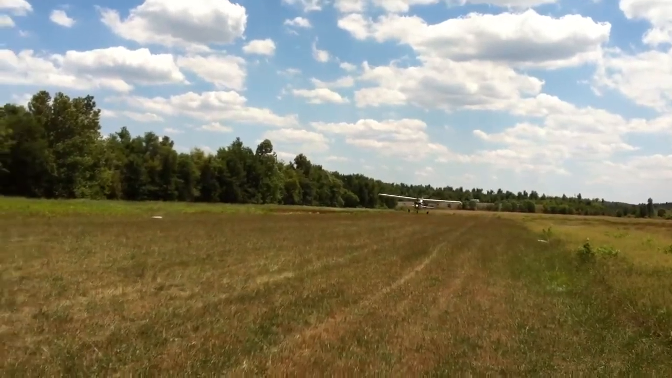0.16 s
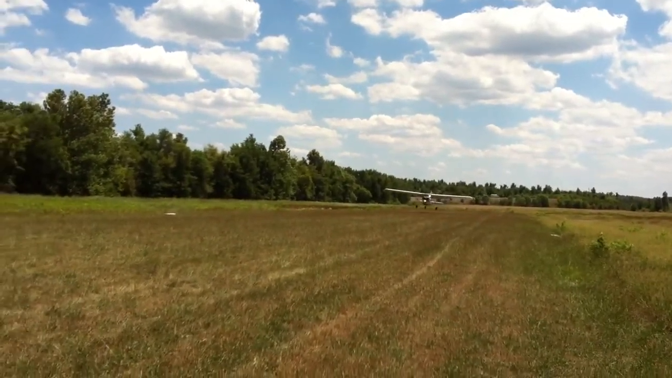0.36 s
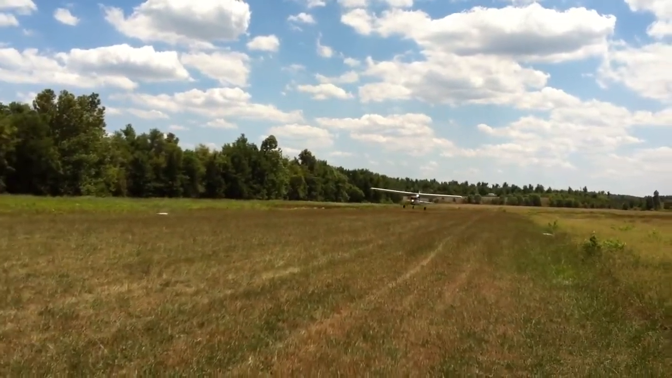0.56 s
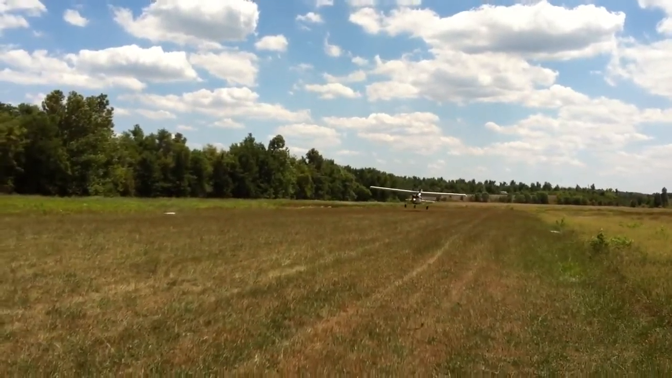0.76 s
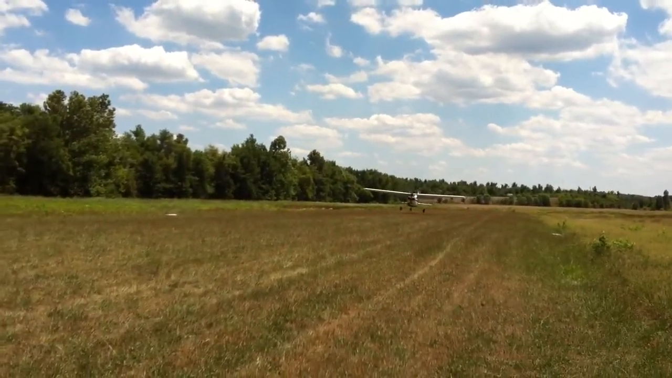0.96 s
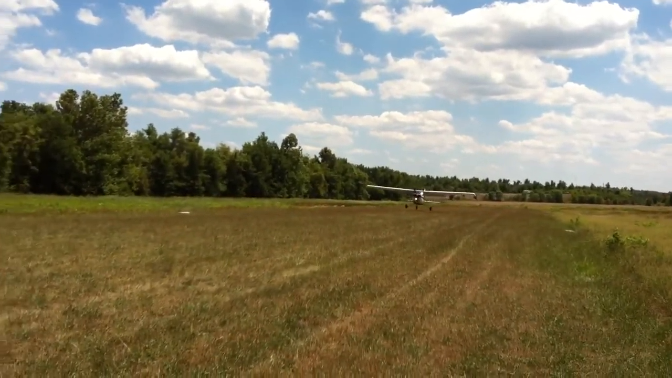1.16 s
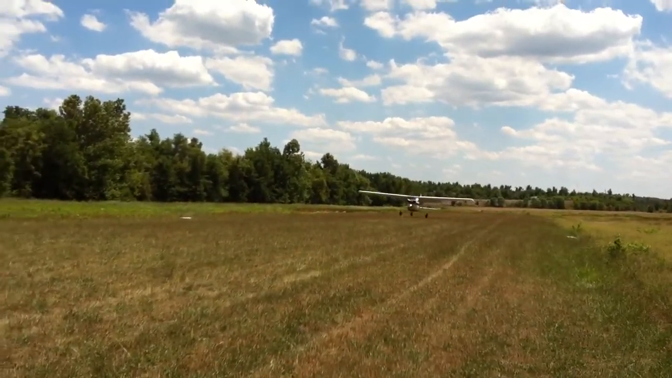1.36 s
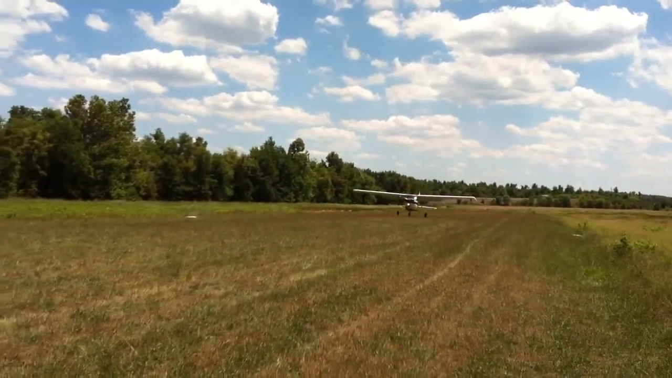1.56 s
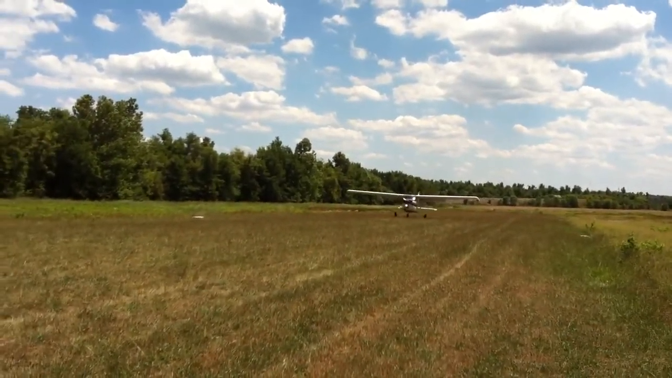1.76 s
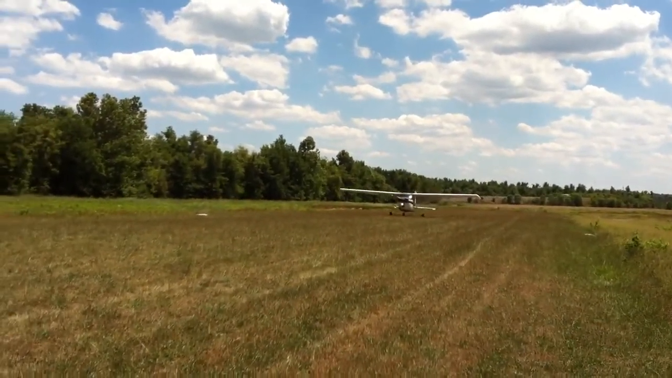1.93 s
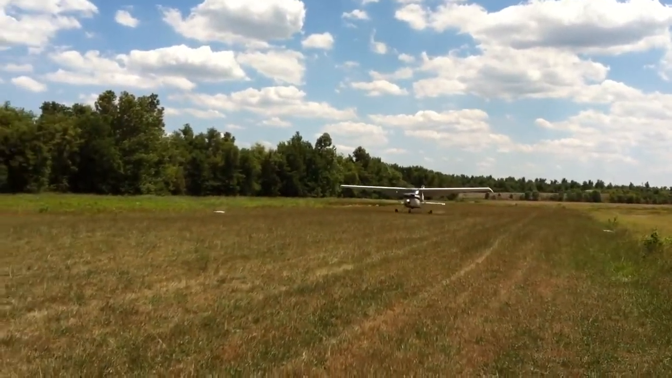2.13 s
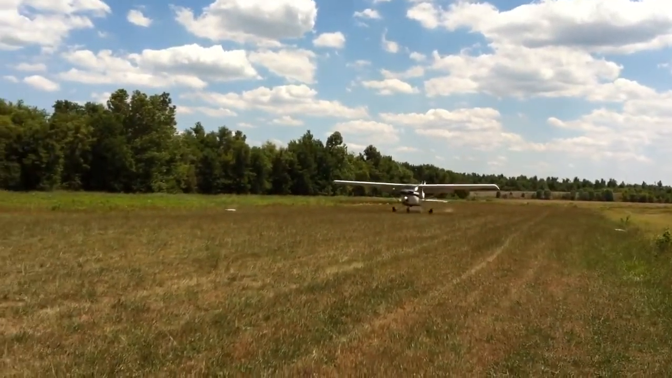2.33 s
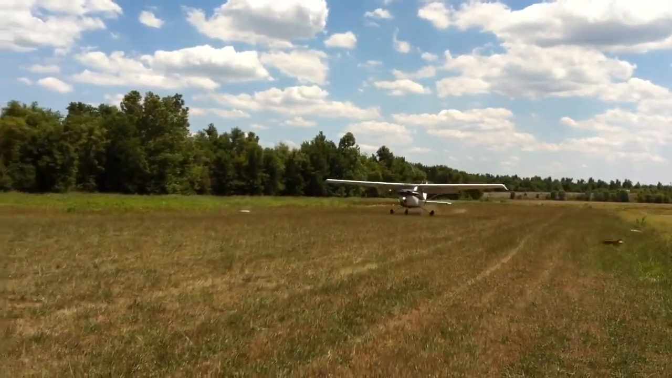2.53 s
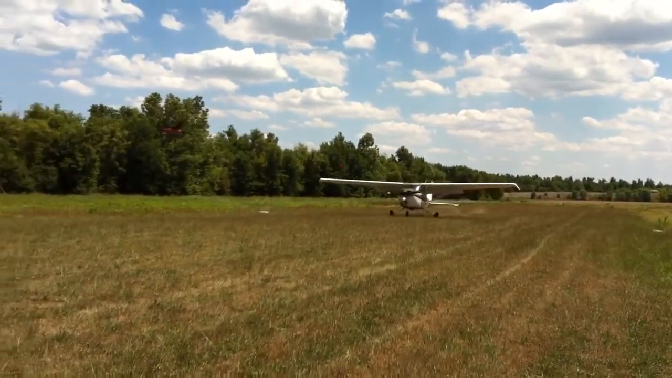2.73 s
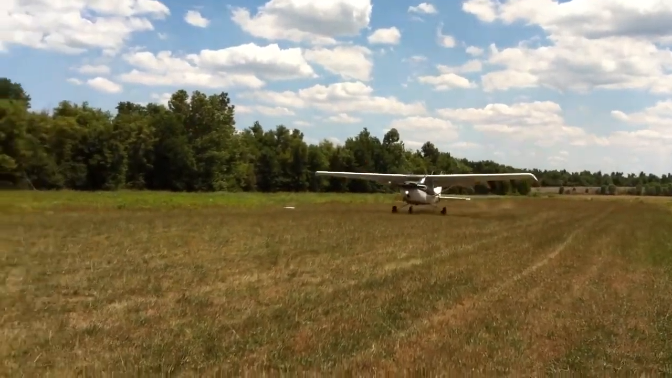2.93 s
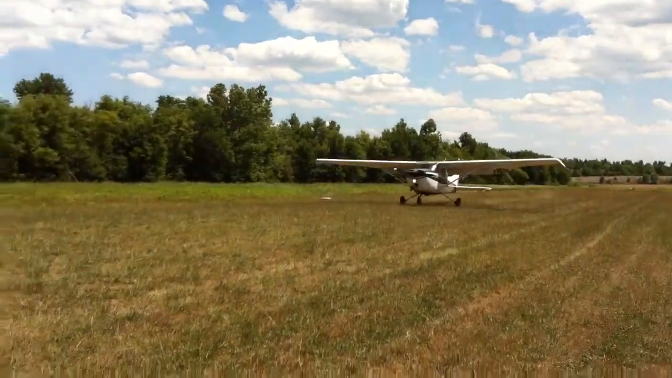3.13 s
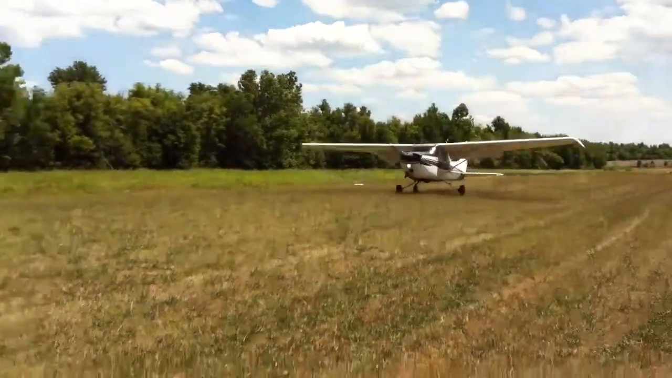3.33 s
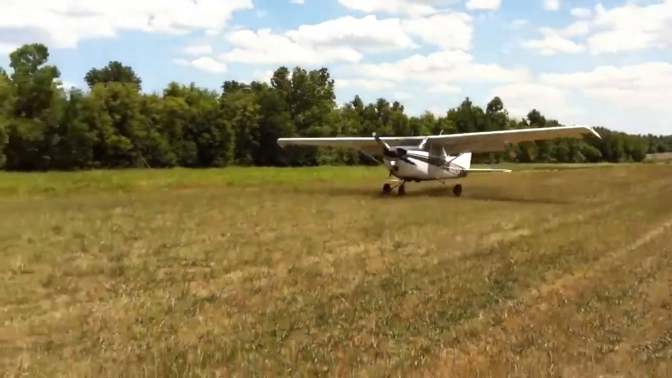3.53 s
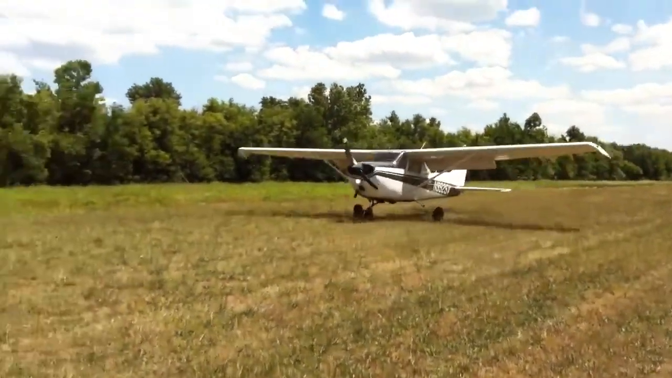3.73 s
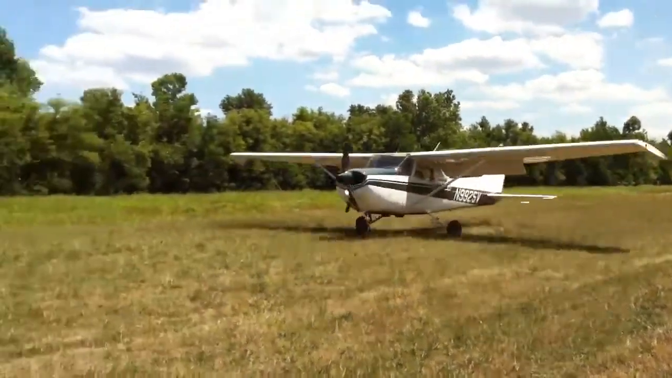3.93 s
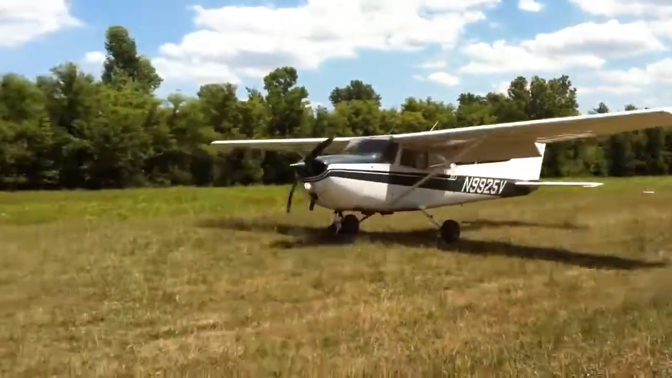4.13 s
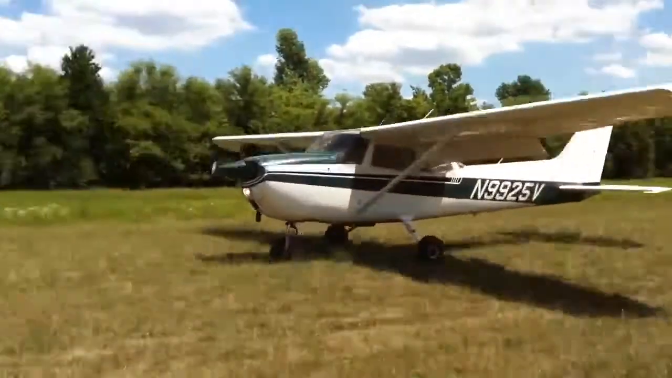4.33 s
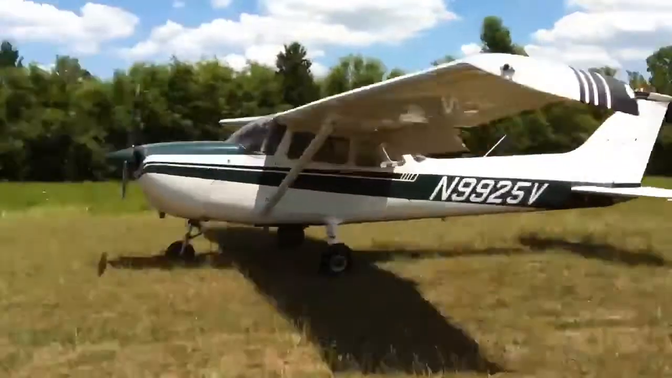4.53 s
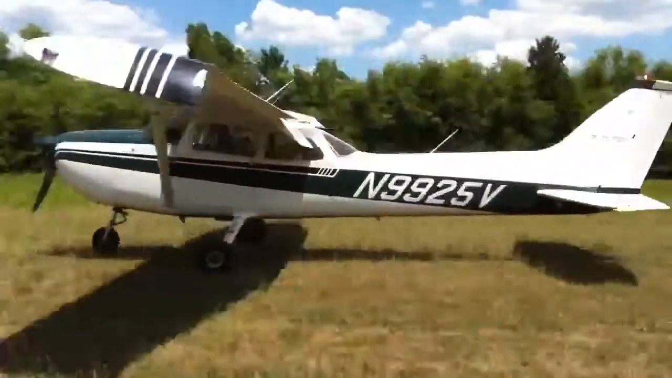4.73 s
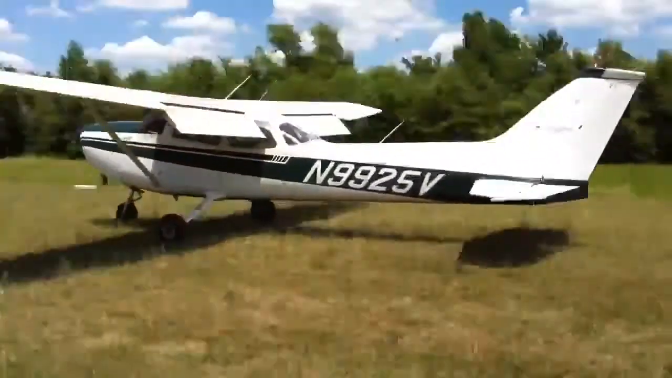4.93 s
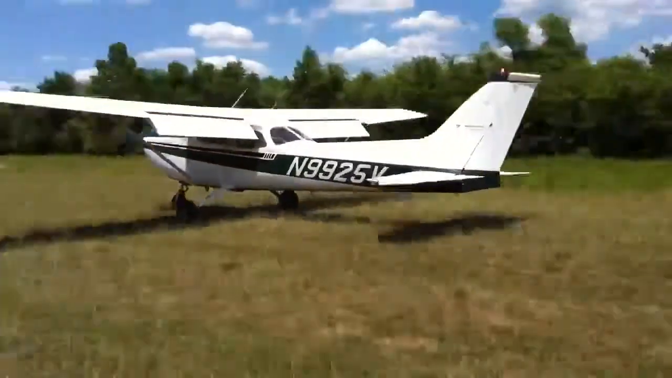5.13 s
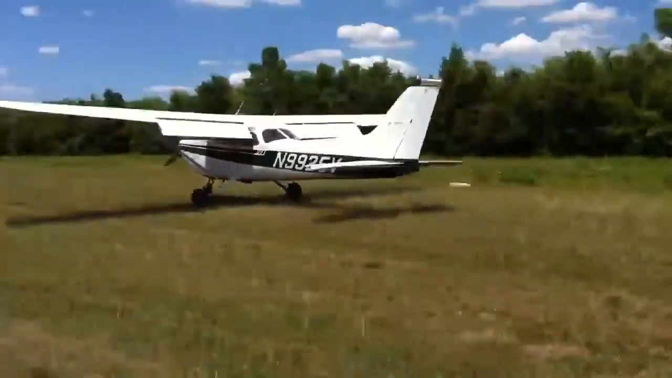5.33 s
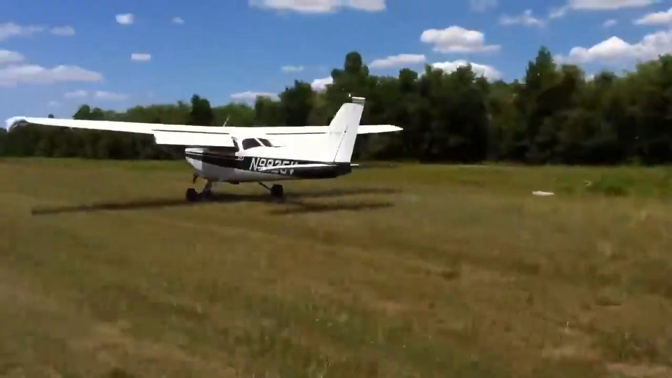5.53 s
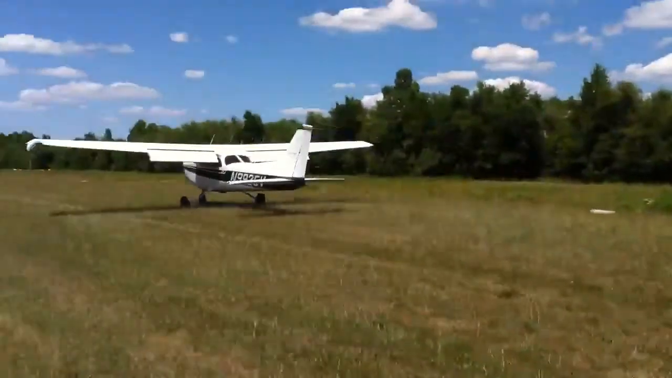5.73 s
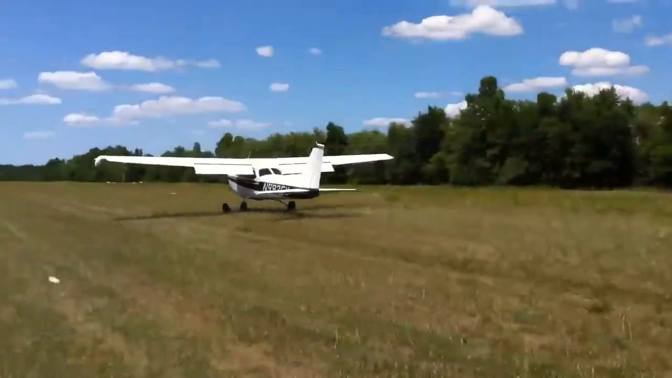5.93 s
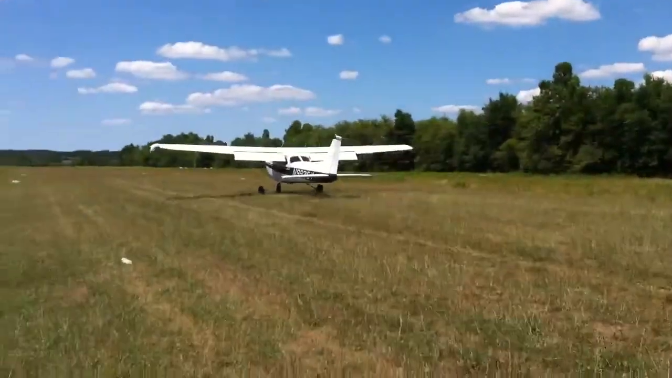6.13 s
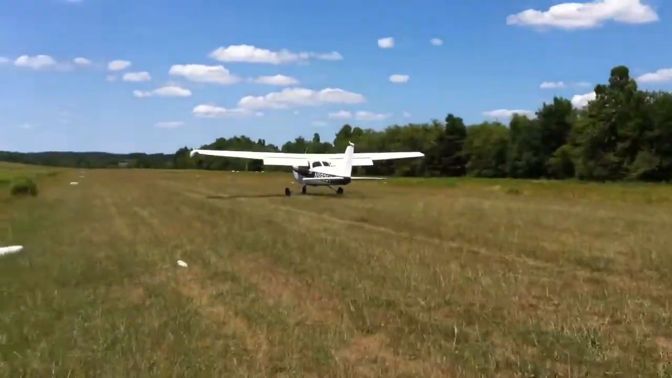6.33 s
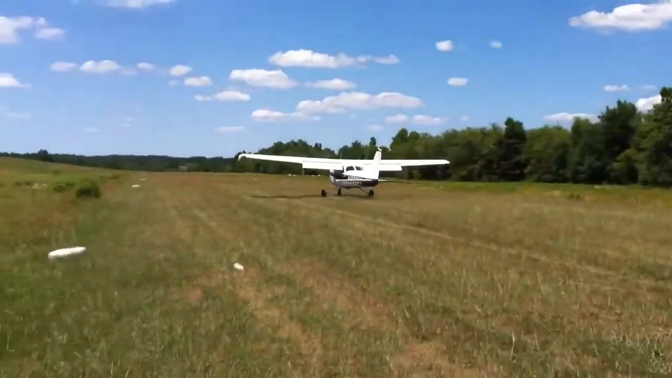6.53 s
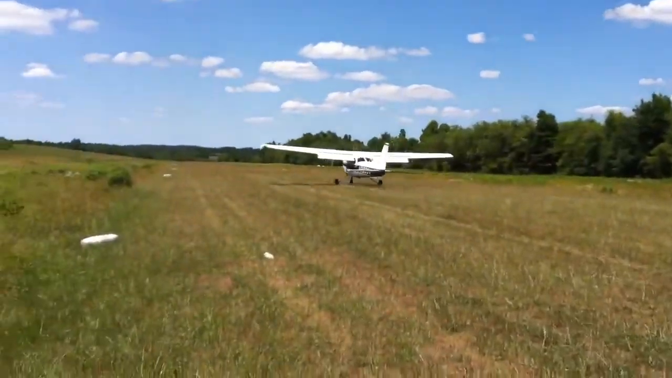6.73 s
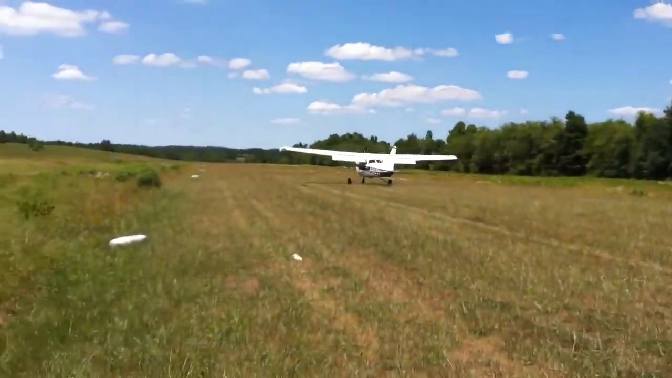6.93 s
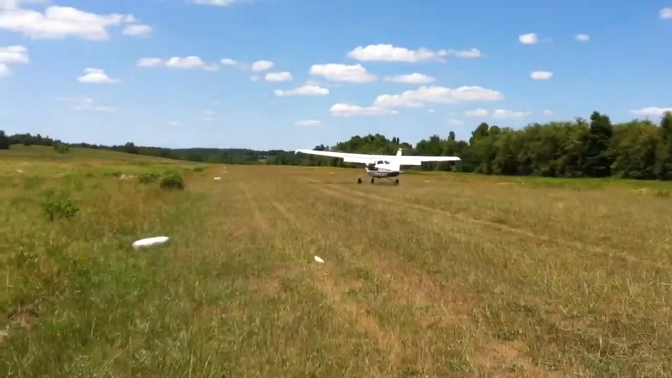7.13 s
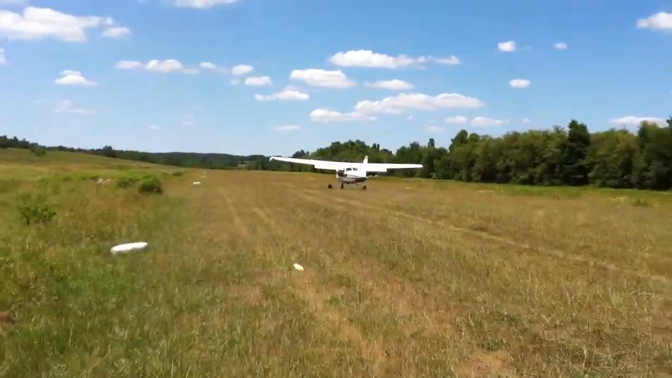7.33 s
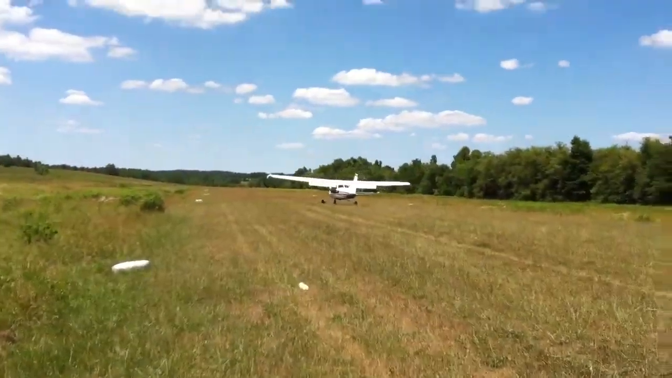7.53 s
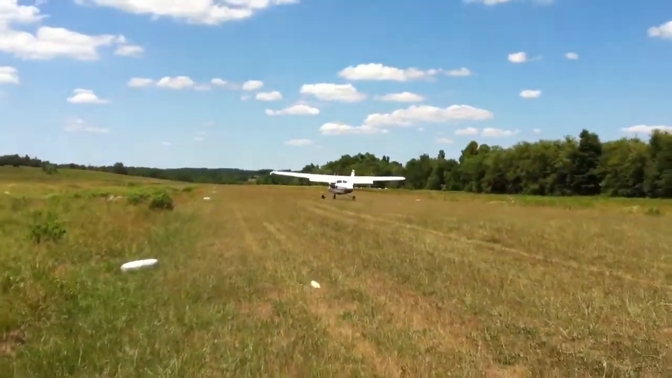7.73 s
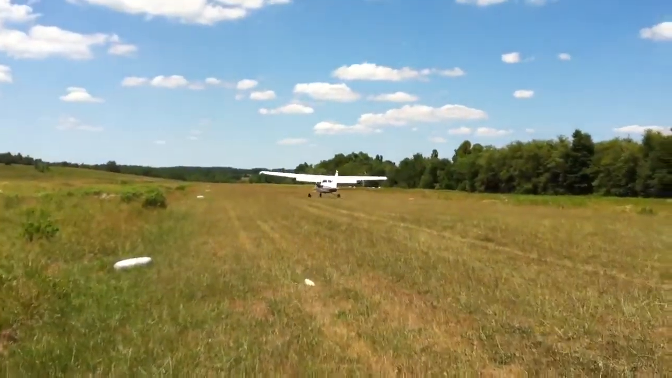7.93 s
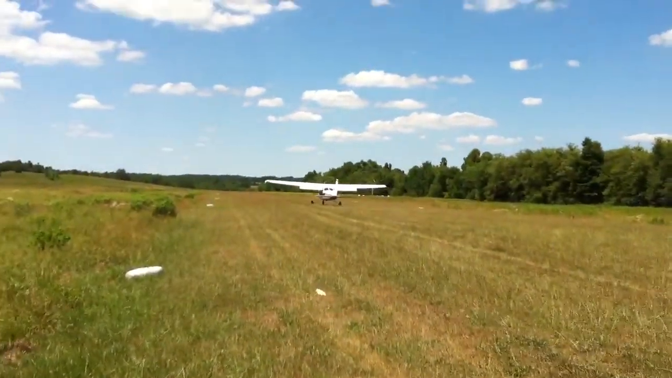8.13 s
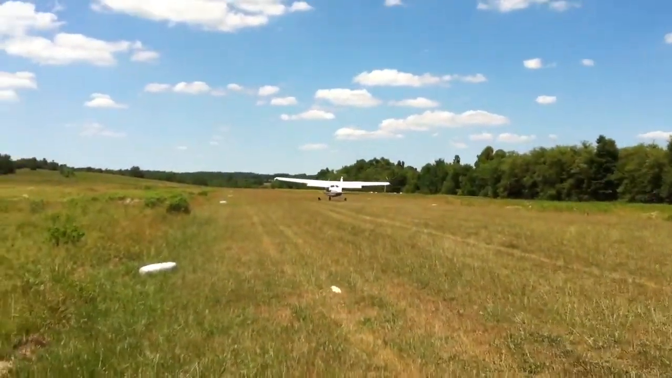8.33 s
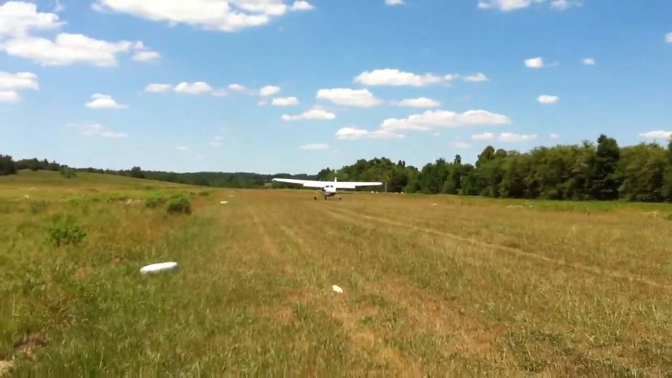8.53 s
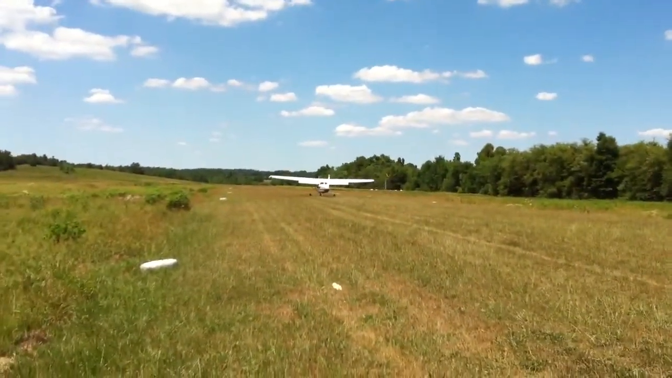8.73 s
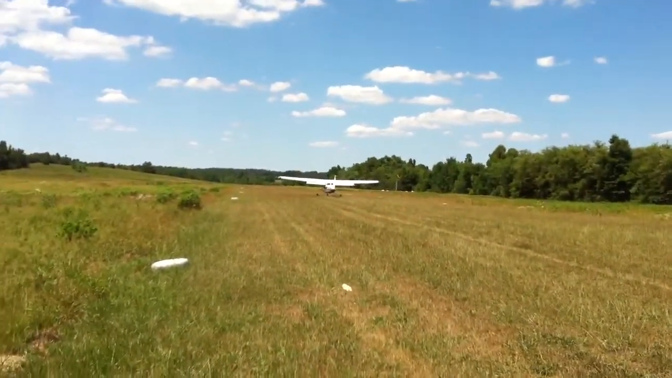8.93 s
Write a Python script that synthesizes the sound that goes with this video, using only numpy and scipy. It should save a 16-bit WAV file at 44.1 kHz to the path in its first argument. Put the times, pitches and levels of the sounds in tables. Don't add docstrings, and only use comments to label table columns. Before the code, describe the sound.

Soft engine popping and blade swish approach over grass, swell into a rumbling, clattering close pass, then recede beneath crackling stubble and foot scuffs.

```python
import sys
import numpy as np
from scipy import signal
from scipy.fft import rfft, irfft, next_fast_len
from scipy.io import wavfile
from scipy.ndimage import uniform_filter1d, map_coordinates

SR = 44100
rng = np.random.default_rng(int(sys.argv[2]) if len(sys.argv) > 2 else 0)


def invert_db(level):
    return 10 ** (np.asarray(level, dtype=float) / 20)


def int16_out(signal):
    q = np.round(np.clip(np.atleast_2d(signal).T, -1, 1) * 32767)
    wavfile.write(sys.argv[1], SR, q.astype(np.int16))


N = 399987

# frequency in Hz, level in dB per Hz.
FLOOR_SPECTRUM = [(18, -55), (45, -27), (140, -4), (379, -22.5), (876, -18.5), (2300, -21.5), (2700, -26.5),
                  (7480, -30.5), (15900, -36.5)]
SOLE_SPECTRUM = [(600, -34), (1000, -2.5), (1500, -1), (2200, -5), (3200, -8), (6500, -20)]
BRUSH_SPECTRUM = [(3000, -17), (5500, -3), (9500, -4), (10500, -2), (12500, -3), (13500, -8), (15600, -5)]
DULL_SPECTRUM = [(700, 6), (1300, -7.5), (2200, 7), (3200, 5), (5000, -11.5), (8000, -60)]
BRIGHT_SPECTRUM = [(3000, -13), (4500, -7.5), (5600, -0.5), (6500, 1.5), (9000, 1), (11000, -11),
                   (15500, -15)]
FLICK_SPECTRUM = [(1500, -20), (2400, -11), (4400, -13), (6500, 4), (9300, -7), (10900, -14), (12500, -3),
                  (15800, -8)]
RUMBLE_SPECTRUM = [(18, -62), (36, -35), (75, -20), (101, -7), (177, 3), (210, 2), (300, -3.5),
                   (393, -10.5), (444, -22), (560, -17.5), (730, -15), (1230, -120)]
CABIN_AHEAD = [(250, -1), (420, -8.5), (449, -14), (542, -9), (640, -2.5), (788, 1.5), (950, 0.5),
               (1150, -3.5), (1300, -2.5), (1690, -19), (2860, -120)]
CABIN_BEHIND = [(250, -14), (430, -3), (520, -12), (650, 1), (780, 2.5), (950, -0.5), (1200, -7.5),
                (1800, -22)]
PANELS_AHEAD = [(680, -12), (1150, -13), (1470, -3), (1670, 0.5), (1950, -5.5), (2260, -0.5), (2680, -7.5),
                (3160, -5), (3600, -11.5), (4100, -17.5), (5200, -16.5), (6760, -13), (11400, -120)]
PANELS_BEHIND = [(680, -56), (1150, -10.5), (1510, 1), (1860, -2.5), (2180, 3.5), (2500, -3.5), (3180, -6),
                 (3840, -7.5), (4910, -13), (5200, -10.5), (6760, -43), (11400, -120)]
HISS_SPECTRUM = [(2940, -27), (5050, -14), (5500, -1), (5870, -0.5), (6370, -1), (8560, 3), (9560, 1),
                 (10800, -13), (14000, -23), (22000, -120)]
SHEEN_SPECTRUM = [(6000, -44), (10200, -14), (10800, -3), (11900, 3.5), (13900, 1), (14600, 4), (15900, -7)]

# start in seconds, hold in seconds, sole in dB, brushed stalks in dB.
SCUFFS = [
    (7.218, 0.22, -58, -62),
    (7.48, 0.17, -57.5, -59),
    (8.183, 0.027, -68, -63),
    (8.288, 0.012, -57, -65),
    (8.742, 0.062, -58.5, -63.5),
]
# start in seconds, peak in dB, ring in Hz, crunch in dB, crunch in Hz.
SNAPS = [(7.141, -39, 7500, -7, 1690), (7.1694, -40.5, 8230, -10, 2160), (7.2805, -39, 8880, -1.5, 2220),
         (7.435, -41, 5500, -21, 2220), (7.505, -43, 4120, -8, 3070), (7.521, -51, 6000, 3, 2000),
         (7.534, -44, 8000, -20, 2000), (7.562, -39, 7000, -20, 2000), (7.571, -52.5, 6900, 9, 1020),
         (7.58, -55, 6900, 6, 1090), (7.59, -56, 6900, 2, 1730), (7.624, -35, 9400, -14.5, 2080),
         (7.6394, -43, 8120, -18, 2150), (7.6965, -34.5, 8600, -11.5, 2870), (7.716, -37, 8600, -16, 3520),
         (7.735, -36.5, 8800, -21.5, 1620), (7.8116, -36, 7250, -17, 3280),
         (7.8872, -35.5, 8700, -11, 4300), (7.926, -41, 6400, -20, 1130), (7.9628, -43.5, 7200, -14, 2230),
         (8.0375, -41, 7040, -21, 1140), (8.113, -44.5, 7690, -9, 3060), (8.192, -45, 6300, -19, 2210),
         (8.203, -42, 6800, -19, 2210), (8.2248, -42.5, 6250, -12, 2240), (8.264, -48.5, 6000, -15, 2200),
         (8.3085, -34.5, 6700, -5.5, 2360), (8.313, -41.5, 4440, -2, 3470), (8.338, -35.5, 8340, -34, 2300),
         (8.3754, -47, 6440, -13, 3040), (8.452, -49, 6500, -20, 2210), (8.486, -47, 6000, -20, 2220),
         (8.524, -48, 6300, -18, 2200), (8.561, -48, 7700, -20, 2200), (8.744, -51, 9200, 4.5, 1760),
         (8.7755, -50, 8900, -1, 1600), (8.892, -46.5, 4100, -17, 2200)]
# time in seconds, pitch in Hz, level in dB.
WHEEL_SQUEAK = [
    (2.64, 7610, -120),
    (2.665, 7450, -61),
    (2.69, 7080, -52),
    (2.73, 7000, -62),
    (2.78, 7050, -51),
    (2.81, 7400, -70),
    (2.84, 7600, -120),
]
# time in seconds, pitch in Hz, level in dB.
BRAKE_SQUEAL = [
    (5.0, 8800, -120),
    (5.13, 8800, -44),
    (5.2, 8760, -52),
    (5.29, 8720, -43),
    (5.42, 8900, -60),
    (5.46, 9400, -53),
    (5.75, 9400, -58),
    (6, 9350, -62),
    (6.3, 9300, -120),
]
# time in seconds, peak in dB,
# bright over dull in dB.
RATTLE_HITS = [(3.4625, -23.5, -3), (3.8077, -27, -6), (3.8402, -21.5, 5), (4.0033, -32, -26), (4.0387, -19, -2),
               (4.1041, -10, 3.5), (4.2464, -21, 23), (4.3534, -14.5, 2), (4.5002, -11.5, 9), (4.5214, -11, 11),
               (4.5686, -6, 1), (4.6414, -9, 5), (5.0365, -18, -4), (5.1034, -21, 3), (5.1234, -19.5, 17),
               (5.2535, -14.5, 3), (5.275, -12.5, 6.5), (5.2984, -14, 8), (5.4127, -22.5, 21), (5.5484, -34, 3),
               (5.7538, -23, 5), (5.7753, -23.5, -3), (5.7904, -30, 6), (5.8391, -23, 1), (5.9065, -31.5, 17),
               (5.9294, -29, 16), (5.9723, -34, 14.5), (6.0664, -25, 2), (6.114, -25, 0), (6.4484, -31.5, 8),
               (2.3087, -46, 3), (2.3396, -39, 3), (2.3994, -41, 7), (2.4304, -44, 8), (2.4604, -41, 7),
           (2.6264, -40, -1), (2.8344, -42, 3), (2.9964, -36, 3), (3.3034, -29, 6), (3.4301, -28, -3),
           (3.5558, -23.5, -1), (3.6794, -41, 3), (3.7444, -38, 0), (3.9389, -29, 7), (3.9664, -24, 10),
           (4.2213, -17, 6), (4.2814, -20.5, 18), (4.3204, -16, 2), (4.3894, -15, 6), (4.4244, -31, 12),
           (4.7784, -19, -9), (4.9197, -24, 3), (4.9566, -29, 3), (4.9844, -27, 5), (5.4974, -32, 0),
           (6.0484, -29, 3), (6.2094, -46, 5), (6.3904, -32.5, 5), (6.5246, -36, 12), (6.5809, -45, 3),
           (6.8124, -48, 3)]
# time in seconds, lift of the rumble in dB, length in seconds.
BUMPS = [(1.685, 0.5, .08), (2.2, 4.5, 0.035), (2.4, 5.5, 0.18), (3.005, 4.5, 0.1), (3.765, 2, 0.018),
         (4.103, 7, 0.093), (4.254, 3, 0.052), (4.598, 6, 0.069), (4.79, 6.5, 0.091), (4.993, 6, 0.013),
         (5.1, 5, 0.041), (5.257, 4.5, 0.12), (5.396, 2, 0.016), (5.865, 5, 0.038), (6.04, 6.5, 0.12),
         (6.82, 3, 0.076), (7.3, 1.5, 0.19), (7.904, 3, 0.057), (8.33, 4.5, 0.059), (8.723, 0.5, 0.041),
         (8.982, -1.5, 0.044)]
# time in seconds, level in dB.
NEARNESS = [(0.0, -59), (1.26, -54.5), (2.02, -51.5), (2.4, -50.5), (2.88, -44), (3.03, -43), (3.99, -35.5),
            (4.22, -32.5), (4.65, -28.5), (4.83, -34), (5.23, -33), (5.46, -36.5), (5.96, -43),
            (6.11, -43.5), (6.74, -48), (7.4, -50.5), (7.96, -56), (9.07, -57)]
# time in seconds, rate in Hz.
FIRING = [(0.0, 34.15), (1.5, 33.15), (1.85, 32.4), (2.8, 32.2), (3.6, 31.58), (4.2, 30.0), (5.4, 27.3),
          (5.7, 27.12), (6.3, 28.24), (6.6, 28.38), (7.5, 26.34), (8.4, 26.75), (9.07, 26.7)]
# time in seconds, share from 0 to 1.
REGULARITY = [(0, .66), (1, .78), (2.1, .74), (2.5, .48), (3.1, .4), (4.6, .12), (5, .07), (9.07, .06)]
# centre in Hz, width in Hz, level in dB.
PIPE = [(141, 75, 19.5), (213, 81, 13), (317, 80, 1.5), (433, 37, -26)]
# engine order, level in dB over the fourth order.
OVERTONES = [(5, -13), (6, -7), (7, -7), (10, -6), (13, -8)]
# time in seconds, share from 0 to 1.
DROPOUT_SHARE = [(0, .2), (2.2, .22), (2.9, .55), (4.25, .6), (4.5, .15), (5.1, .2), (5.4, .5), (6.4, .35),
                 (6.9, .22), (7.6, .2), (7.75, .35), (8.4, .25), (9.07, .2)]
# frequency in Hz, readiness to vanish.
DROPOUT_BANDS = [(0, 0), (3800, 0), (4800, .12), (5600, 0), (9500, .02), (10600, .4), (11600, .2),
                 (13500, .3), (14600, .5), (15200, 1.5), (22050, 2)]

TURNED_S, TURNING_S = 5.7, 0.37


def unit(x):
    return x / np.sqrt(np.mean(x ** 2) + 1e-20)


def noise():
    return rng.standard_normal(N)


def curves(rows):
    s, *columns = np.transpose(rows)
    return [np.interp(np.arange(N) / SR, s, column) for column in columns]


def wobble(rate):
    coarse = np.arange(0, N + 16, 16)
    knots = rng.standard_normal(int(N * rate / SR) + 4)
    return np.interp(np.arange(N), coarse, map_coordinates(knots, [coarse * rate / SR]))


def after(s, width_s):
    return 1 / (1 + np.exp((s - np.arange(N) / SR) / width_s))


def filtered(x, response):
    m = next_fast_len(N + SR // 2)
    return irfft(rfft(x, m) * response(np.fft.rfftfreq(m, 1 / SR)), m)[:N]


def coloured(x, spectrum):
    f, db = np.transpose(spectrum)
    return unit(filtered(x, lambda hz: invert_db(np.interp(np.log(hz + 1), np.log(f + 1), db, -120, -120))))


def lumpy(spectrum, depth_db, rate):
    return coloured(invert_db(depth_db * wobble(rate)) * noise(), spectrum)


def meadow():
    return invert_db(-62) * coloured(noise(), FLOOR_SPECTRUM)


def foot_scuffs():
    t, sole, brush = np.arange(N) / SR, 0, 0
    for s, hold, sole_db, brush_db in SCUFFS:
        rise = np.clip((t - s) / 0.0074, 0, 1)
        shape = rise * invert_db(-500 * np.clip(t - s - hold, 0, 1))
        sole = sole + invert_db(sole_db) * shape
        brush = brush + invert_db(brush_db) * shape
    return sole * lumpy(SOLE_SPECTRUM, depth_db=1.5, rate=150) + brush * coloured(noise(), BRUSH_SPECTRUM)


def stalk_snaps():
    out, t = np.zeros(N + SR), np.arange(SR // 8) / SR
    spit, crush = coloured(noise(), BRIGHT_SPECTRUM), coloured(noise(), DULL_SPECTRUM)
    narrow = coloured(noise(), [(1, 3), (400, -15), (1000, -22)])
    broad = coloured(noise(), [(1, 4), (200, -10), (700, -18)])
    for s, db, ring_hz, crunch_db, crunch_hz in SNAPS:
        k = round((s - 0.001197) * SR)
        rise = invert_db(db + 4.5) * (1 - np.exp(-t / 0.0024)) ** 2
        fall_db = -60 * t / 0.032
        ring = narrow[k:][:len(t)] * np.sin(2 * np.pi * ring_hz * t)
        crunch = broad[-k:][:len(t)] * np.sin(2 * np.pi * crunch_hz * t) + 0.25 * crush[k:][:len(t)]
        bright = invert_db(fall_db - 7.5) * spit[k:][:len(t)] + invert_db(fall_db - 9.5) * ring
        out[k:][:len(t)] += rise * (bright + invert_db(0.67 * fall_db + crunch_db + 2.5) * crunch)
    out[round(.208 * SR):][:len(t)] += invert_db(-52 - 60 * t / .02) * spit[:len(t)]
    return out[:N]


def squeal(rows, blur_hz):
    hz, db = curves(rows)
    uneven = np.clip(blur_hz / 150, 0, 1)
    grip = 1 - uneven + uneven * wobble(blur_hz)
    return invert_db(db) * grip * np.sin(2 * np.pi * np.cumsum(hz) / SR)


def wheels():
    return squeal(WHEEL_SQUEAK, blur_hz=35) + 1.5 * squeal(BRAKE_SQUEAL, blur_hz=260)


def part_db(abreast_db, growth, behind_db, far_db):
    near_db, = curves(NEARNESS)
    level = abreast_db + growth * (near_db - near_db.max())
    over_grass = 1 - after(2.3, 0.096)
    return level + behind_db * after(TURNED_S, TURNING_S) + far_db * over_grass


def fairing_flicks():
    when, size = rng.random((2, int(160 * N / SR)))
    strength = invert_db(-6 * np.log(size + .05))
    hits = np.bincount((when * (N - 1)).astype(int), strength, N)
    decay = invert_db(-60 * np.arange(SR // 50) / SR / 0.003)
    gate = signal.fftconvolve(hits, decay)[:N]
    return invert_db(part_db(-46.5, 1.3, 0.3, -2)) * coloured(gate * noise(), FLICK_SPECTRUM)


def rattles():
    dull, bright, t = np.zeros(N + SR), np.zeros(N + SR), np.arange(SR // 10) / SR
    shape = (1 - np.exp(-t / 0.0072)) ** 2 * invert_db(-60 * t / 0.069)
    for s, db, tilt_db in np.array(RATTLE_HITS):
        k = round((s - .004) * SR)
        dull[k:][:len(t)] += invert_db(db - tilt_db / 2 - 5.5) * shape
        bright[k:][:len(t)] += invert_db(db + tilt_db / 2 - 4.5) * shape ** 1.265
    metal = dull[:N] * lumpy(DULL_SPECTRUM, depth_db=4.0, rate=430)
    return metal + bright[:N] * lumpy(BRIGHT_SPECTRUM, depth_db=5.5, rate=280)


def ground_bumps():
    t = np.arange(0, N, 16) / SR
    swell_db = sum(db * np.exp(-((t - s) / length) ** 2) for s, db, length in BUMPS)
    return np.interp(np.arange(N) / SR, t, swell_db)


def tyre_rumble():
    roll = lumpy(RUMBLE_SPECTRUM, depth_db=0.3, rate=42)
    bass = filtered(roll, lambda hz: 1 / (1 + (hz / 77.5) ** 4))
    return roll - after(TURNED_S, TURNING_S) * bass


def cabin_drumming(turns, past, regular, bump_db):
    puff = invert_db(3.1 * regular * np.cos(2 * np.pi * turns - .6))
    fore = lumpy(CABIN_AHEAD, depth_db=1.6, rate=50)
    aft = lumpy(CABIN_BEHIND, depth_db=1.6, rate=50)
    level_db = part_db(-34.5, 1.22, -1.2, 2) + 0.61 * bump_db
    return invert_db(level_db) * puff * (np.sqrt(1 - past) * fore + np.sqrt(past) * aft)


def panel_buzz(past, skin_db):
    front = lumpy(PANELS_AHEAD, depth_db=1.34, rate=60)
    back = lumpy(PANELS_BEHIND, depth_db=1.34, rate=60)
    return invert_db(part_db(-31.5, 1.21, -1.5, -5) + skin_db) * (np.sqrt(1 - past) * front + np.sqrt(past) * back)


def blade_swish(turns, regular):
    hz, t, z = signal.stft(noise(), SR, nperseg=128, noverlap=96)
    at = np.minimum((t * SR).astype(int), N - 1)
    hz = hz[:, None]
    angle = 2 * np.pi * (turns[at] - .11 * hz / 1000)
    tip_hz = 8300 + 900 * wobble(25)[at]
    patch = sum(np.exp(-((hz - k * tip_hz) / 1100) ** 2) for k in (1, 1.5))
    depth_db = 13.5 * np.maximum(regular[at] - .03, 0)
    blade = np.maximum(np.cos(angle), 0) * (1.5 + 0.08 * np.cos(angle / 2))
    gate = invert_db(depth_db * patch * blade)
    gate /= np.sqrt(uniform_filter1d(gate ** 2, 200, 1))
    return signal.istft(z * gate, SR, nperseg=128, noverlap=96)[1][:N]


def propeller_hiss(turns, regular, skin_db):
    air = blade_swish(turns, regular)
    hiss = coloured(invert_db(1.52 * wobble(90)) * air, HISS_SPECTRUM)
    sheen = coloured(invert_db(2.5 * wobble(120)) * air, SHEEN_SPECTRUM)
    return invert_db(part_db(-32.5, 1.49, 3, 1) + skin_db) * hiss + invert_db(part_db(-38.5, 1.82, -2.5, 1) + skin_db) * sheen


def pipe_response(f):
    modes = sum(invert_db(db) * 1j * f * w / (c * c - f * f + 1j * f * w) for c, w, db in PIPE)
    return modes * (1j * f / (105 + 1j * f)) ** 3 / (1 + 1j * f / 420) ** 3


def exhaust_pops(turns):
    at = np.flatnonzero(np.diff(np.floor(turns)))
    size, late = rng.standard_normal((2, len(at)))
    late_samples = (0.00025 * SR * late).astype(int)
    pops = np.zeros(N)
    pops[np.clip(at + late_samples, 0, N - 1)] = invert_db(2.2 * size + 0.46 * (-1) ** np.arange(len(at)))
    return unit(filtered(pops, pipe_response))


def engine_orders(turns, regular, surge_db):
    second_db = part_db(-56.5, .5, -9.5, 1.5)
    fourth_db = part_db(-46.5, 0.64, -8.5, -0.2)
    second = invert_db(second_db + 3.0 * wobble(11)) * np.sin(4 * np.pi * turns)
    fourth = invert_db(fourth_db - 1.2 + surge_db + 2.6 * wobble(14)) * np.sin(8 * np.pi * turns + .25 * wobble(5))
    lagged = turns - 0.025
    upper = sum(invert_db(db + 3.5 * wobble(7)) * np.sin(2 * np.pi * k * lagged) for k, db in OVERTONES)
    return second + fourth + invert_db(fourth_db - 0.5 - 5.9 * after(1.5, .3)) * regular * upper


def plane():
    turns = np.cumsum(curves(FIRING)[0]) / SR + .22
    regular, = curves(REGULARITY)
    bump_db = ground_bumps()
    skin_db = 0.21 * bump_db
    past = after(4.55, 0.077)
    surge_db = 2.4 * wobble(5)
    pops = np.sqrt(regular) * invert_db(.7 * surge_db) * exhaust_pops(turns)
    low = pops + np.sqrt(1 - regular) * tyre_rumble()
    rolling = invert_db(part_db(-33.5, 1.11, 4, 1) + bump_db) * low
    shake = invert_db(1.07 * wobble(70))
    skin = shake * (panel_buzz(past, skin_db) + propeller_hiss(turns, regular, skin_db))
    cabin = cabin_drumming(turns, past, regular, bump_db)
    return rolling + cabin + skin - engine_orders(turns, regular, surge_db)


def scene():
    near = meadow() + foot_scuffs() + stalk_snaps()
    return (near + wheels() + fairing_flicks() + rattles() + plane())[None]


def treble_dropouts(x):
    hz, t, z = signal.stft(x, SR, nperseg=1024)
    luck = rng.random((len(hz) // 4 + 1, len(t) // 3 + 1))
    luck = np.repeat(np.repeat(luck, 4, 0), 3, 1)[:len(hz), :len(t)]
    readiness = np.interp(hz, *np.transpose(DROPOUT_BANDS))[:, None]
    gone = luck < readiness * np.interp(t, *np.transpose(DROPOUT_SHARE))
    return signal.istft(z * np.where(gone, .02, 1), SR, nperseg=1024)[1][..., :N]


def band_limit(x):
    return signal.sosfilt(signal.butter(12, 15700, fs=SR, output="sos"), x)


def record(dry):
    mix = treble_dropouts(dry)
    return band_limit(mix)


dry = scene()
out = record(dry)
int16_out(out)
```